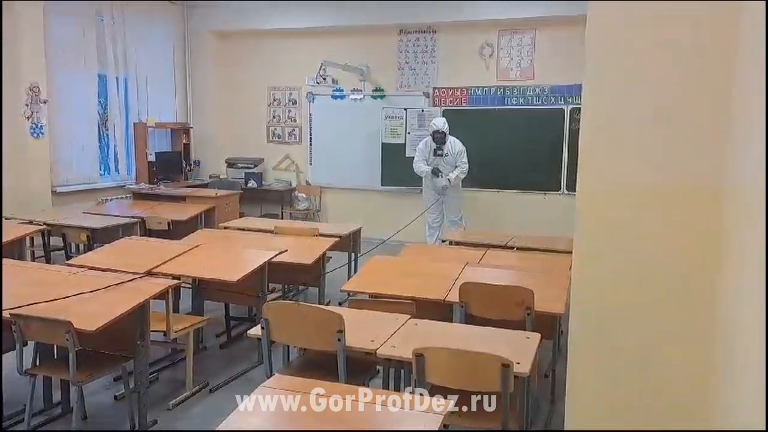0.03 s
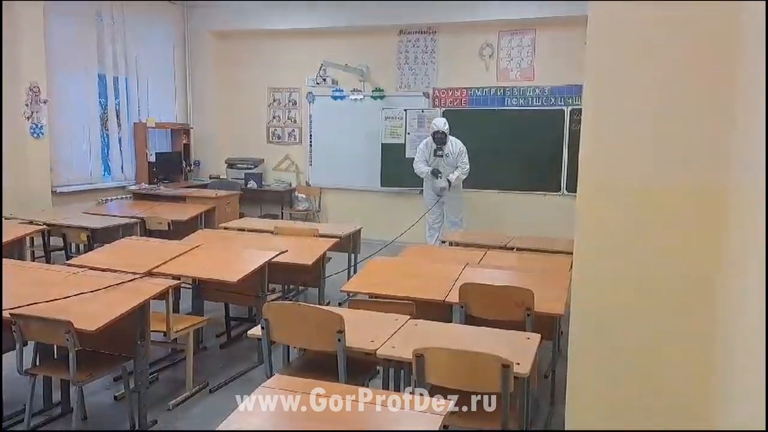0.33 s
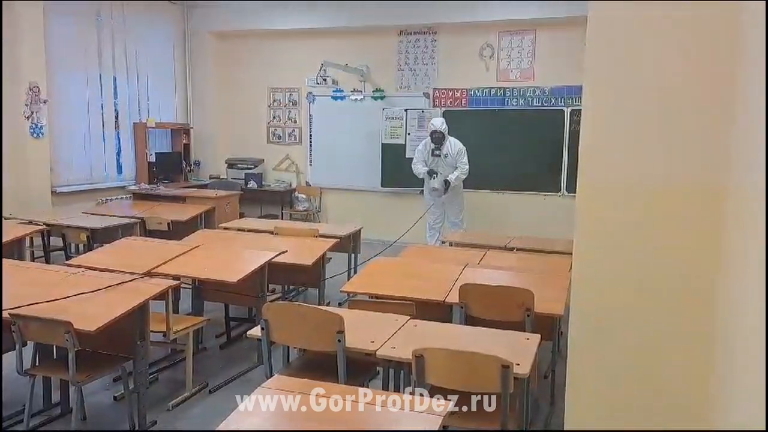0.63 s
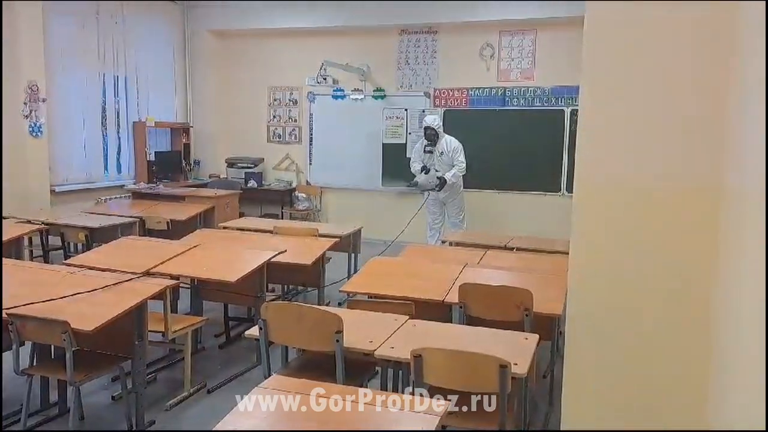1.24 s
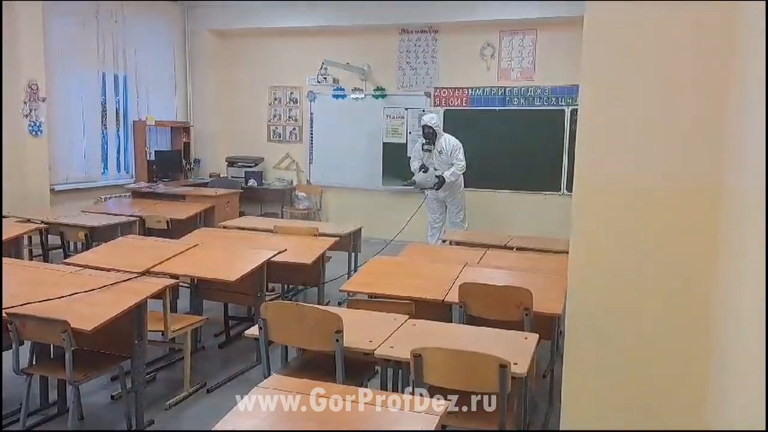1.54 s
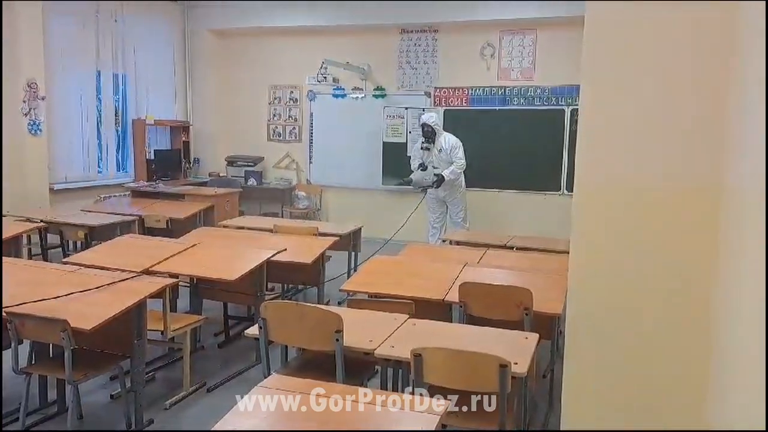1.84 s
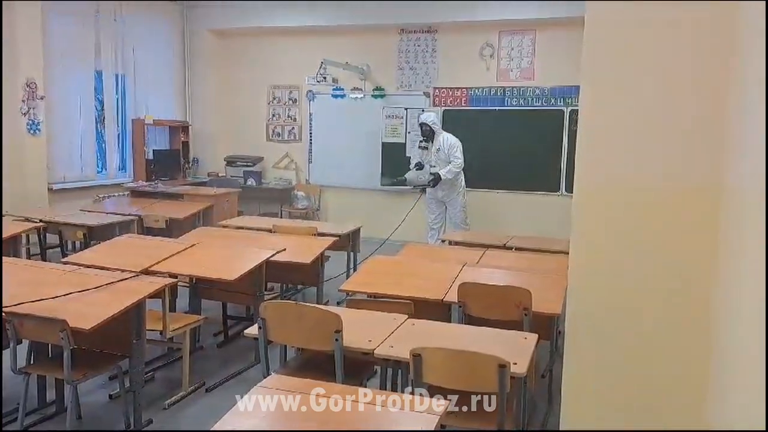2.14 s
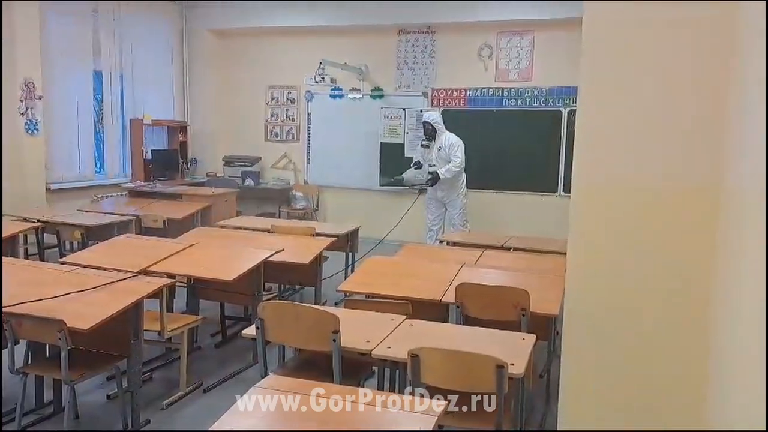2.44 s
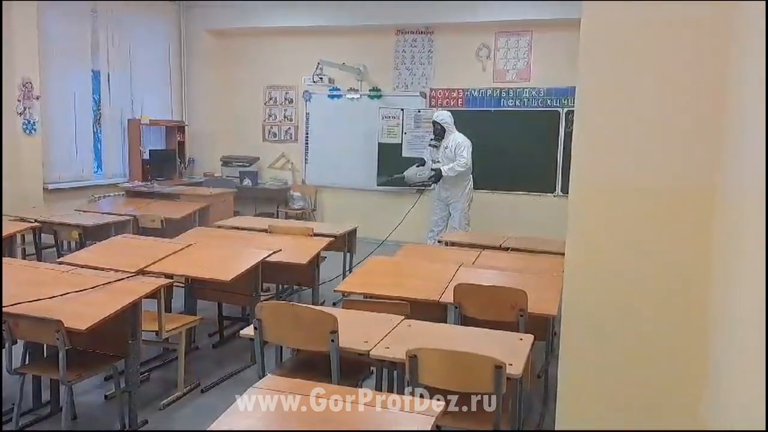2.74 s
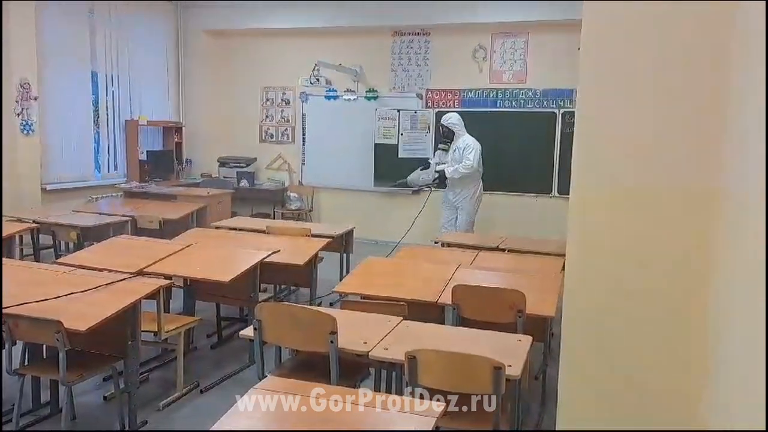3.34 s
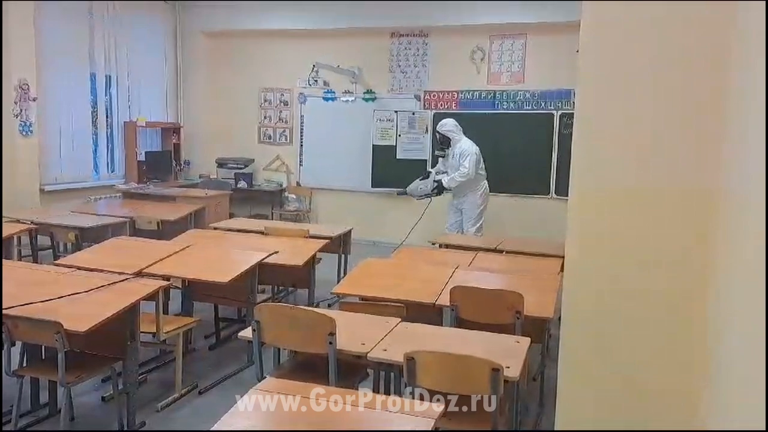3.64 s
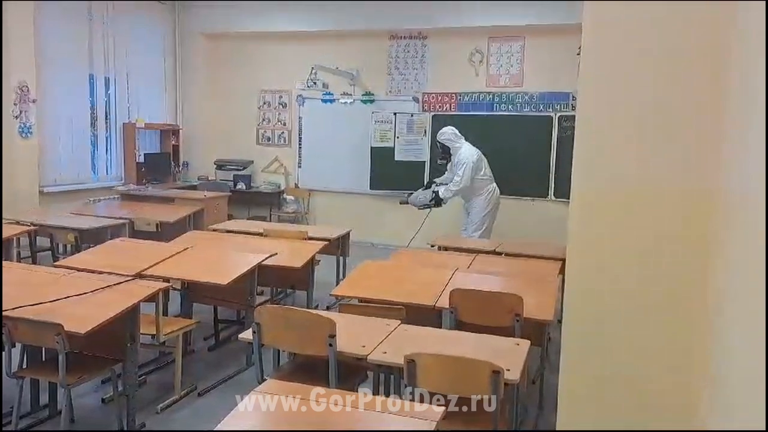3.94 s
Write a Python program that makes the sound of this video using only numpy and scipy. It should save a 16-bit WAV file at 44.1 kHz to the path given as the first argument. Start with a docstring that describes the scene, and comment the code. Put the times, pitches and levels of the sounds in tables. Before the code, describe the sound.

A motorised fogging sprayer drones on one pitch while its nozzle hisses without a break. Heard in stereo from across an empty classroom, the hum drifts from side to side and the hiss echoes lightly off desks and walls.

```python
"""An empty classroom, heard through two microphones 15 cm apart; the room rumbles faintly.
At the far end an electric disinfectant fogger runs steadily, carried slowly along the wall.
The nozzle's jet hisses, brighter as it swings towards the microphones, and echoes off desks and walls.
The blower hums at the shaft rate; standing waves make it swell and fade differently at each microphone."""
import sys
import numpy as np
from scipy import signal
from scipy.fft import rfft, irfft
from scipy.io import wavfile
from scipy.ndimage import uniform_filter1d, map_coordinates

SR = 44100
rng = np.random.default_rng(int(sys.argv[2]) if len(sys.argv) > 2 else 0)


def generate_wav(signal):
    """Clip the signal to [-1, 1] and save it as 16-bit WAV at the path in sys.argv[1]."""
    frames = np.transpose(np.atleast_2d(signal))
    scaled = np.clip(frames, -1, 1) * 32767
    pcm = np.round(scaled).astype(np.int16)
    wavfile.write(sys.argv[1], SR, pcm)


N = 176400
TIME = np.arange(N) / SR
BIN_HZ = np.maximum(np.arange(N // 2 + 1) * SR / N, 1)


def undb(db):
    """Decibels to gain."""
    return 10 ** (np.asarray(db) / 20)


def unit(x):
    """Scale to rms 1."""
    return x / np.sqrt(np.mean(x ** 2))


def curve(table):
    """Every column of a table, joined by straight lines in time."""
    times, *columns = np.array(table, float).T
    return np.array([np.interp(TIME, times, column) for column in columns])


def walk(rate_hz):
    """Random levels held 1 / rate_hz s and smoothed twice; spread about 1."""
    hold = int(SR / rate_hz)
    held = np.repeat(rng.standard_normal(N // hold + 1), hold)
    return 1.35 * uniform_filter1d(uniform_filter1d(held, hold), hold)[:N]


def diffuse(spacing_m=0.15, bass_likeness=0.81):
    """Spectrum of white noise (0 dB per Hz) reaching the pair from all sides: alike in the bass only."""
    likeness = bass_likeness * np.sinc(2 * BIN_HZ * spacing_m / 343)
    mid, side = rfft(rng.standard_normal((2, N))) * np.sqrt([1 + likeness, 1 - likeness])
    return np.array([mid + side, mid - side]) * np.sqrt(SR) / 2


def ring(hz, half_width_hz):
    """Diffuse noise in one steep-sided resonance, rms 1."""
    return unit(irfft(diffuse() / (1 + ((BIN_HZ - hz) / half_width_hz) ** 2), N))


# Low resonances of the classroom (frequency [Hz], half width [Hz], level [dB])
ROOM_MODES = [(40, 12, -61.5), (59.7, 7.7, -58), (117.7, 10, -57.5), (136.7, 9.5, -56.5), (289, 15, -57.5)]
# Soft booms, centred between the microphones (time [s], half length [s], level [dB])
ROOM_BOOMS = [(.3, 0.11, -43), (0.664, 0.073, -47)]
def room(boom_hz=135):
    """Low resonances rumble all round the microphones; two soft booms swell and fade."""
    rumble = sum(undb(db) * ring(hz, width) for hz, width, db in ROOM_MODES)
    swell = sum(undb(db) * np.exp(-((TIME - at) / length) ** 2) for at, length, db in ROOM_BOOMS)
    wavering_hz = boom_hz * (1 + 0.021 * walk(14.4))
    boom = np.sqrt(2) * np.sin(2 * np.pi * np.cumsum(wavering_hz) / SR)
    return rumble + swell * boom


def reflections(direct, count=7, echo_db=-8, delay_s=(0.004, 0.04), sway_s=0.000199):
    """Echoes off desks and walls swirl as the moving fogger shifts their paths; the total level holds."""
    echoes = np.zeros_like(direct)
    for mic, delays in enumerate(rng.uniform(*delay_s, (2, count))):
        for delay in delays:
            sent_s = TIME - delay - sway_s * walk(1.2)
            echoes[mic] += map_coordinates(direct[mic], [sent_s * SR], order=3, mode="wrap")
    return (direct + undb(echo_db) * echoes / np.sqrt(count)) / np.hypot(1, undb(echo_db))


# Base spectrum of the jet, filling the room (frequency [Hz], left level [dB/Hz], right level [dB/Hz])
JET_SPECTRUM = [(160, -70.5, -69.2), (300, -69.5, -68.2), (450, -68.9, -67.5), (700, -70.3, -68.9),
                (950, -69.6, -67.3), (1500, -66.4, -65.7), (1950, -64.4, -64.5), (2400, -61.6, -61.6),
                (2850, -62.8, -62.8), (3300, -61.1, -61.5), (4100, -61.4, -62.0), (4900, -60.0, -61.2),
                (5900, -62.4, -63.5), (7300, -61.1, -62.1), (8500, -63.6, -68.4), (9300, -63.6, -69.2),
                (10700, -60.9, -65.9), (12200, -61.6, -63.0), (13000, -66.0, -64.9), (13900, -69.6, -67.9),
                (15400, -67.8, -67.3)]
# Swing of the nozzle towards the microphones and away (time [s], hiss gain [dB], spray gain [dB])
NOZZLE_AIM = [(0, 0.5, -0.4), (.35, 0.7, 0.1), (.65, -.1, 0), (1.0, 1.0, 1.4), (1.35, 0.5, 1.3),
              (1.6, 0, 0.5), (2.05, -0.4, 0.9), (2.5, 0.5, -0.2), (3.0, -0.35, -1), (3.55, 0.5, -.7),
              (4, 0.5, -1.2)]
# Rise and fall of the jet's low roar (time [s], gain [dB])
ROAR_GAIN = [(0, 0.5), (1.1, 0.5), (1.5, -4), (2.0, -4.5), (2.6, -2), (3.2, -4.5), (3.6, 0.5), (4, -1)]
def jet(low_cut_hz=128, roar_below_hz=480, spray_above_hz=7400, trim_db=0.04, flicker_db=0.3):
    """The air jet from across the room: roar, hiss and finest spray; its aim moves level and brightness."""
    hz, *mic_levels = np.array(JET_SPECTRUM, float).T
    colour = undb([np.interp(np.log(BIN_HZ), np.log(hz), db) for db in mic_levels])
    air = diffuse() * colour / np.hypot(1, (low_cut_hz / BIN_HZ) ** 2)
    low = 1 / (1 + (BIN_HZ / roar_below_hz) ** 6)
    high = 1 / (1 + (spray_above_hz / BIN_HZ) ** 6)
    flicker = flicker_db * np.array([walk(34.9), walk(35.5)])
    hiss_db, spray_db = curve(NOZZLE_AIM) + trim_db + flicker
    roar = irfft(air * low, N) * undb(curve(ROAR_GAIN))
    hiss = irfft(air * (1 - low - high), N) * undb(hiss_db)
    spray = irfft(air * high, N) * undb(spray_db)
    return roar + reflections(hiss + spray)


# Hum as the fogger moves through the standing waves (time [s], left level [dB], right level [dB])
HUM_LEVELS = [(0, -26.7, -31.0), (0.3, -21.6, -27.0), (0.55, -23.2, -31.8), (0.78, -22.5, -41.0),
              (1, -22.9, -28.0), (1.25, -22.8, -22.5), (1.7, -23.2, -20.0), (2.05, -25.5, -20.6),
              (2.5, -32.6, -21.8), (2.9, -23.0, -27.0), (3.15, -21.6, -32.5), (3.45, -21.1, -28.4),
              (3.72, -23.7, -28.3), (4, -20.6, -24.8)]
# The octave's own standing waves, before its trim (time [s], left level [dB], right level [dB])
OCTAVE_LEVELS = [(0, -49, -68), (0.6, -45, -34), (1.2, -41, -40), (1.8, -38.5, -47), (2.15, -47, -50),
                 (2.5, -36, -38.5), (2.85, -45.5, -58), (3.25, -33, -43.6), (3.55, -41.5, -45.3),
                 (3.75, -40, -35), (4, -36, -35)]
# The hum's image wanders as the fogger moves (time [s], delay at the right microphone [ms])
HUM_DELAY = [(0, -0.6), (.28, 0.1), (.65, -0.25), (.9, 0.3), (2.5, .33), (3, 0.68), (3.5, 0.31), (4, 0.22)]
# Faint whines of the impeller and motor (frequency [Hz], half width [Hz], level [dB])
MOTOR_WHINES = [(845, 22, -55), (2476, 30, -52), (4280, 35, -50), (4420, 25, -52), (4903, 4, -47.5),
                (5550, 6, -50.5)]
def blower(shaft_hz=544.4, throb_hz=13, throb_db=0.22, octave_trim_db=-1.5, flicker_db=2,
           skirt_db=-44, skirt_half_width_hz=11):
    """The blower at the far wall: its shaft's throbbing hum and octave, an airy skirt and faint whines."""
    hz = shaft_hz * (1 + 0.00022 * walk(1.47) + 0.00043 * walk(39.8))  # slow drift, quick flutter
    delay_s = np.array([[0], [1]]) * curve(HUM_DELAY) / 1000
    phase = 2 * np.pi * (np.cumsum(hz) / SR - shaft_hz * delay_s)
    throb_rate = throb_hz * (1 + 0.105 * walk(4.25))
    throb = throb_db * np.sin(2 * np.pi * np.cumsum(throb_rate) / SR)
    hum = undb(curve(HUM_LEVELS) + throb) * np.sin(phase)
    flicker = flicker_db * np.array([walk(22), walk(18)])
    octave = undb(octave_trim_db + curve(OCTAVE_LEVELS) + flicker) * np.sin(2 * phase)
    # unsteady air flow smears the hum into a skirt of noise
    skirt = unit(irfft(diffuse() / np.hypot(1, (BIN_HZ - shaft_hz) / skirt_half_width_hz), N))
    whines = sum(undb(db) * ring(f, width) for f, width, db in MOTOR_WHINES)
    return np.sqrt(2) * (hum + octave) + undb(skirt_db) * skirt + whines


def scene():
    """The distant fogger and the classroom, as they reach the two microphones."""
    return blower() + jet() + room()


def record(dry, top_hz=15720):
    """The recorder cuts the top steeply."""
    return signal.sosfilt(signal.ellip(12, .1, 80, top_hz, fs=SR, output="sos"), dry)


dry = scene()
out = record(dry)
generate_wav(out)
```